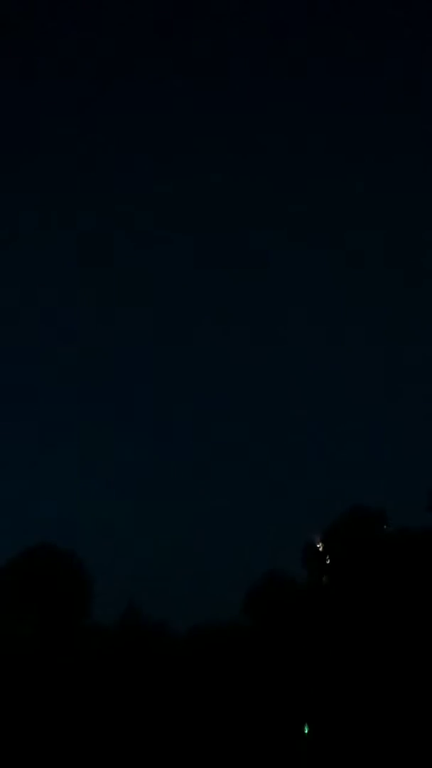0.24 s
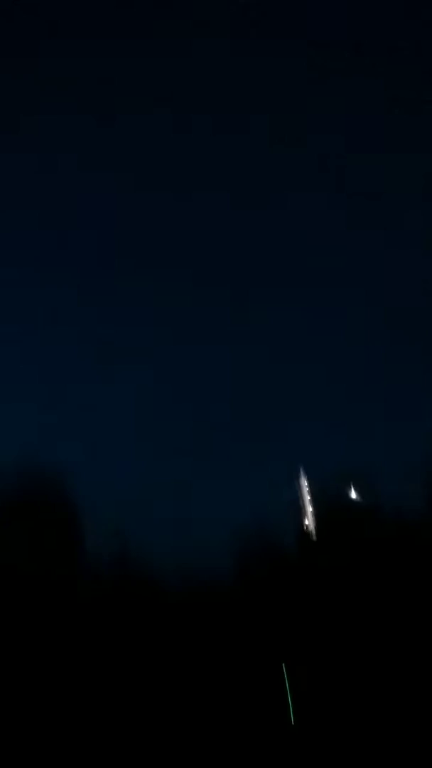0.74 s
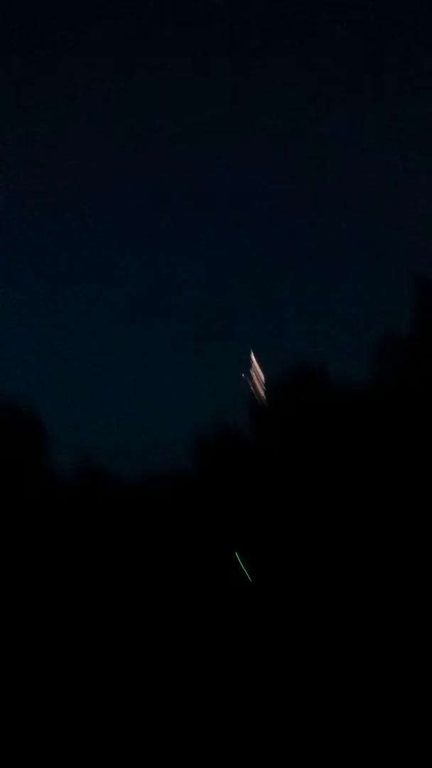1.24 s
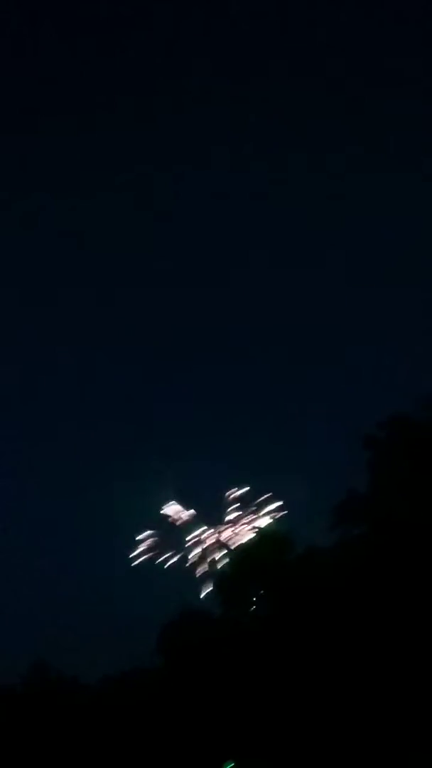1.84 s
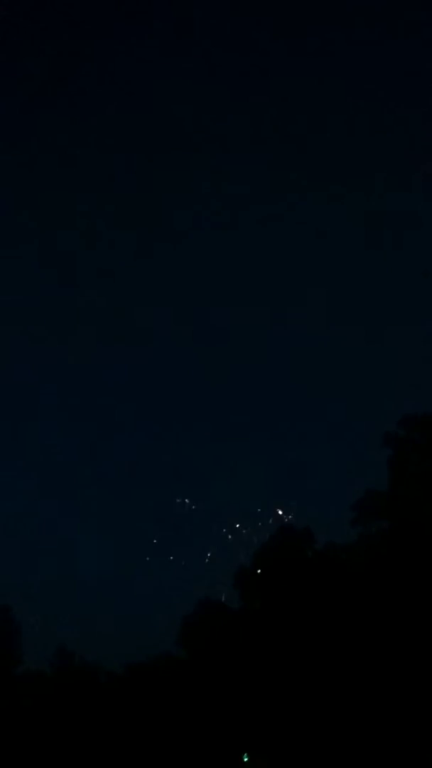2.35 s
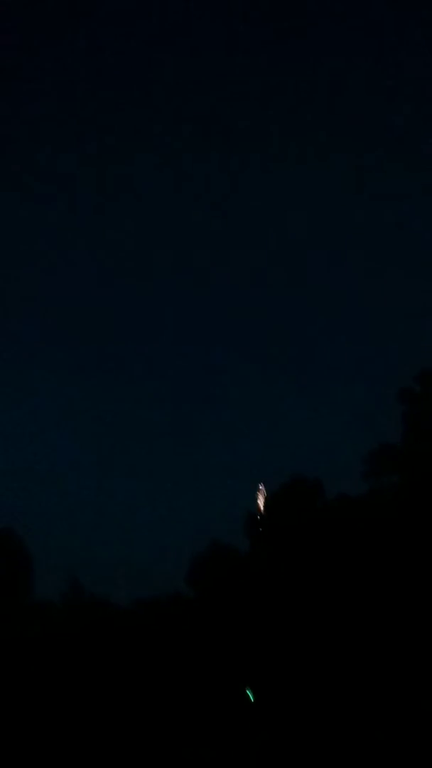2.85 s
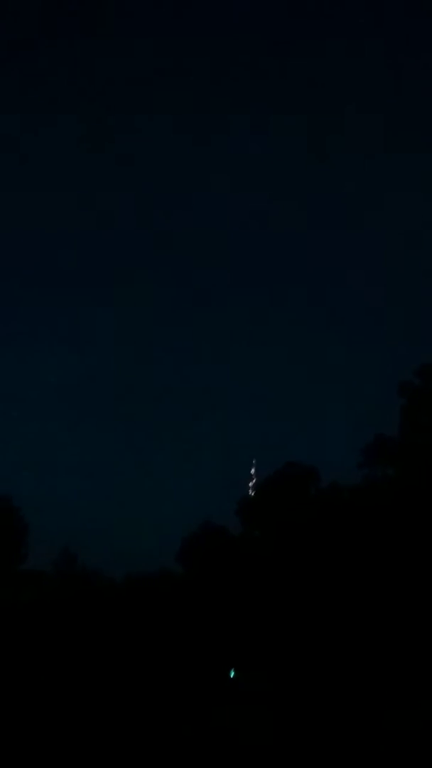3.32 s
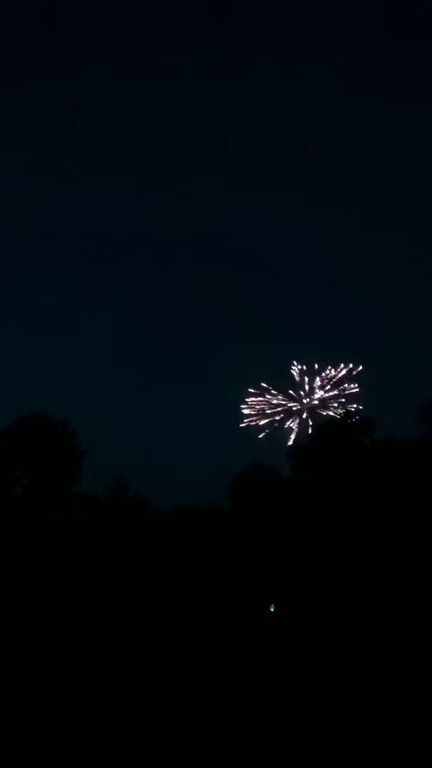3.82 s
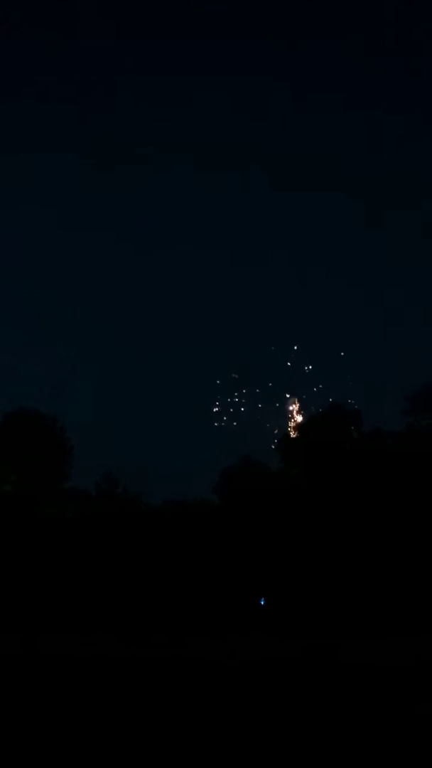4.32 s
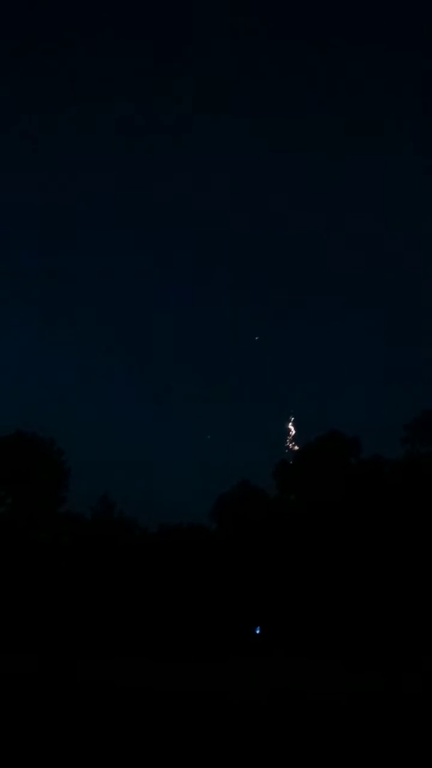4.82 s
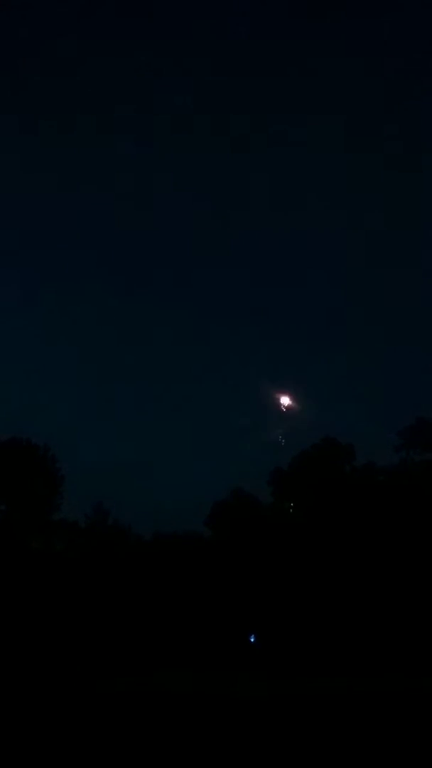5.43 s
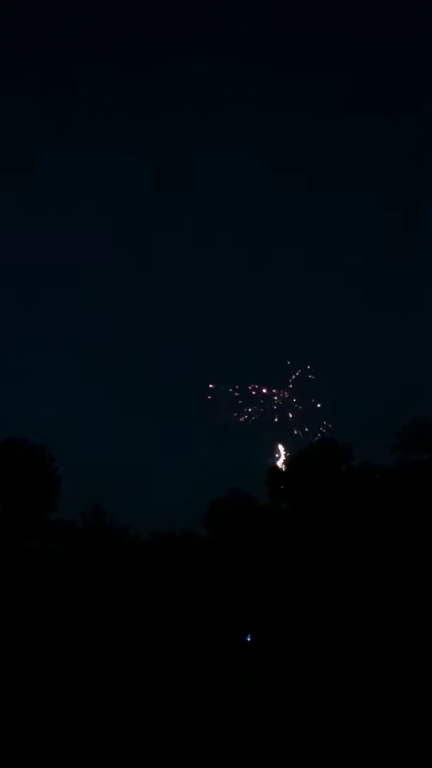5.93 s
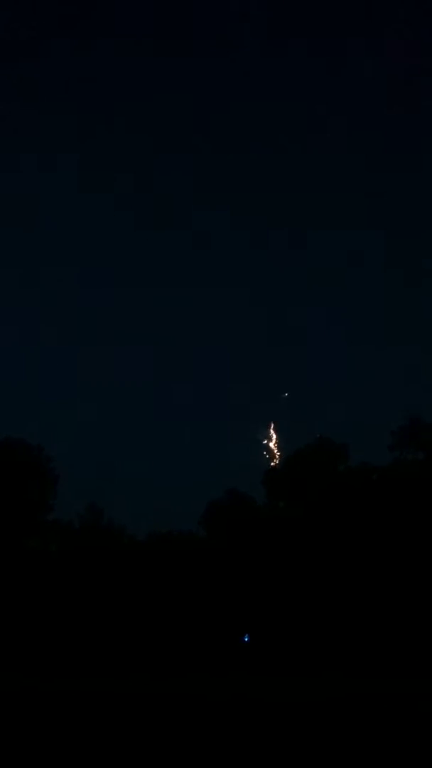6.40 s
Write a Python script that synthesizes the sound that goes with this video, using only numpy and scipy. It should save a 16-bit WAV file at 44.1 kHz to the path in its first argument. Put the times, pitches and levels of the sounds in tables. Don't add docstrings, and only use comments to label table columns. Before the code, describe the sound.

Three firework shells fire and burst beyond a tree-ringed garden. Each tube launch gives a short crack and low thump, followed by hissing and a heavy, distorted bang that bounces off houses and rolls off. Between them, stars crackle: loud and near at first, then finer and more distant. The microphone overloads on the bangs, and its handheld body colours them with a brief ring.

```python
import sys
import numpy as np
from scipy import signal
from scipy.fft import rfft, irfft, next_fast_len
from scipy.io import wavfile
from scipy.ndimage import uniform_filter1d

SR = 44100
rng = np.random.default_rng(int(sys.argv[2]) if len(sys.argv) > 2 else 0)


def natural_amplitude(level_db):
    exponent = np.asarray(level_db, float) / 20
    return 10 ** exponent


def unload_wav(signal):
    wavfile.write(
        sys.argv[1],
        SR,
        np.round(np.clip(np.atleast_2d(signal).T, -1, 1) * 32767).astype(np.int16),
    )


N = 293706

RUMBLE = [(24, -55), (40, -23.5), (145, -5.5), (394, -2), (696, -3), (1100, -13), (1430, -11.5),
          (2420, -120)]
FAR_ECHO = [(700, 5.5), (1000, -4), (1300, -3.5), (1800, -2.5), (2500, -10), (3800, -9.5), (4400, -11.5),
            (6000, -75)]
LEAVES = [(2000, 5), (3500, -2), (5000, -2.5), (7000, -21.5), (10000, -33), (12500, -63)]
YARD = [(350, -46), (550, -7), (850, 3.5), (1100, -12), (1400, -19)]
LANE = [(550, -19), (750, -4), (950, -1.5), (1150, -6), (1400, -27)]
CUPPED = [(2700, -22), (3300, 0), (3700, -13), (4100, -1), (4600, -17), (5400, -12)]
HEDGE = [(900, -20), (1500, 1), (2300, -2.5), (3900, -1), (4300, -27), (6000, -24)]
FUSE_HISS = [(1300, -4), (2400, 1), (2840, 9.5), (3380, -0.5), (4130, 8), (5600, -1), (6100, -17),
             (9000, -49)]
COMET_HISS = [(1400, -4.5), (1950, 4), (2500, -9), (3400, -16), (4050, 7.5), (4700, 0.5), (5500, -5.5),
              (6300, -30)]
AIR = [(6000, -33), (7500, -10), (11000, -7.5), (14500, -7), (15700, -1), (16100, -46)]
# f/Hz, left-right correlation
LIKENESS = [(60, 0), (180, 0.88), (550, 1), (1650, 0.31), (4970, -0.0), (15000, 0)]
# f/Hz, left minus right level/dB
LEAN = [(60, -22), (150, 3), (380, 5), (950, 4), (2380, 1.5), (5980, -3.5), (15000, 8)]

# t/s, near trees level/dB, their T60/s, valley level/dB, brightness/dB
TAILS = [
    (-.5, -28.5, 1.4, -37, 14),
    (1.852, -20, 0.12, -62, -4),
    (1.928, -25.5, 1.12, -38, 0),
    (3.542, -32, 0.72, -49, -2.5),
    (3.968, -28, 1.15, -35.5, 5),
    (5.297, -35.5, 0.88, -54, -2),
    (5.974, -32, 1.39, -44.5, 5),
]
# t/s, level/dB, T60/s
YARD_ROLLS = [
    (-.3, -39, 2.4),
    (1.94, -34, 1.37),
    (3.99, -34, 1.5),
    (5.99, -38, 1.7),
]
LANE_ROLLS = [
    (1.95, -40, 0.54),
    (4.05, -36, 0.63),
    (6.01, -35, 0.55),
    (6.1, -39, 0.62),
    (6.32, -40.5, 0.63),
]
CUPPED_ROLL = (1.935, -35.5, 0.76)
# t/s, level/dB
FUSE = [(0, -57), (.8, -55.5), (1.05, -49.5), (1.25, -45), (1.85, -43.5), (2.05, -46), (2.5, -56),
        (3.05, -52), (3.5, -43.5), (3.93, -43), (4.1, -50), (4.6, -50.5), (5.25, -51.5), (5.35, -45.5),
        (5.95, -43), (6.1, -52), (6.66, -54)]
# t/s, level/dB
COMET = [(0, -66), (1.0, -53), (1.3, -51), (1.6, -41.5), (1.88, -41.5), (2.0, -78), (3.2, -59),
         (3.6, -48.5), (3.93, -52), (4.05, -72), (5.25, -76), (5.4, -57.5), (5.94, -49), (6.05, -77),
         (6.66, -71)]

# t/s, crack level/dB, thump level/dB, thump f/Hz, late thump level/dB
LAUNCHES = [
    (1.849, -23.5, -12, 276, -18),
    (3.542, -24.5, -14.5, 270, -18),
    (5.2994, -28, -18, 265, -21),
]

# t/s, level/dB, brightness/dB
STARS = [(0.207, -27, 11), (0.229, -35, 5), (0.235, -29.5, 8), (0.2637, -25, 13), (0.2733, -22, 21),
         (0.2913, -17.5, 6), (0.3012, -30, -11), (0.3072, -16.5, 4), (0.313, -32, -4),
         (0.327, -21, -18), (0.334, -26, 13), (0.34, -16.5, -12), (0.344, -15.5, 6), (0.3514, -16.5, 4),
         (0.3603, -24, 12), (0.3961, -19, 0), (0.403, -24, 17), (0.4185, -22, 17), (0.4244, -20, 8),
         (0.4334, -16.5, 10), (0.443, -14.5, 20), (0.456, -14, -1), (0.475, -22, 11), (0.483, -21, 4),
         (0.4954, -20, 30), (0.511, -22, -8), (0.522, -27, 12), (0.5416, -29, -3), (0.564, -20.5, -20),
         (0.5754, -30, -6), (0.613, -20.5, 1), (0.63, -28, 17), (0.6539, -23, 16), (0.7211, -23.5, -11),
         (0.7378, -26, -11), (0.75, -16.5, -1), (0.778, -23, -11), (0.7925, -17.5, -20),
         (0.8253, -27, -6), (0.8454, -11.5, -4), (0.8583, -36, 5), (0.349, -22, 14), (0.379, -24, 6),
         (0.4155, -25, 12), (0.449, -25, 12), (0.463, -22, 8), (0.491, -24, 3), (0.316, -35, 8),
         (0.3305, -29, 8), (0.8775, -36, -5),
         (0.9156, -26, 11), (0.9228, -28, -4), (0.943, -27, -4), (0.952, -30, 6), (0.955, -26, 2),
              (0.9713, -13.5, -11), (0.9792, -38, 16), (0.987, -29, 7), (0.9963, -27, 12), (1.0024, -27, 9),
              (1.008, -29, 21), (1.0343, -26, 15), (1.045, -30, 9), (1.0488, -25.5, 19), (1.0536, -35, 11),
              (1.089, -17, 18), (1.104, -18.5, 4), (1.1114, -24, 14), (1.152, -30, 12), (1.1566, -24, 3),
              (1.183, -14, 16), (1.1875, -13.5, 12), (1.1978, -21, 30), (1.2039, -20, 26), (1.209, -16, 21),
              (1.2176, -14.5, 27), (1.2617, -10.5, 14), (1.267, -7, 14), (1.278, -11.5, 14),
              (1.2837, -12, 28), (1.2924, -8, 3), (1.3073, -14, 32), (1.3367, -8.5, 50), (1.349, -18, 29),
              (1.359, -25, 5), (1.364, -22, 19), (1.3713, -6, 53), (1.4141, -6, 53), (1.4975, -9.5, 33),
              (1.5168, -19, 25), (1.5732, -6, 34), (1.604, -16.5, 16), (1.7574, -13, 8), (1.332, -18, 25),
         (2.1518, -13.5, 3.8), (2.2105, -14.5, 11), (2.4641, -22, 8.2), (2.659, -36, 2),
             (2.7739, -50, 4), (2.8245, -32.5, 8.2), (2.845, -31, 4.5), (2.881, -33.5, 23),
             (2.914, -33.5, 28), (2.9308, -38, 18), (2.9534, -33, 30), (3.0082, -32.5, 26),
             (3.0132, -36, 26), (3.0327, -31, 24), (3.0366, -47, 13), (3.045, -33, 19), (3.0763, -29.5, 27),
             (3.1115, -43, 15), (3.1263, -33, 26), (3.1472, -26, 45), (3.149, -34, 39), (3.171, -30, 35),
             (3.185, -30.5, 27), (3.1954, -24, 25), (3.203, -25, 27), (3.2088, -23.5, 27),
             (3.2215, -29, 22), (3.236, -23.5, 21), (3.246, -29, 31), (3.2839, -28, 29), (3.3213, -19, 49),
             (3.4293, -15.5, 33), (3.4467, -21, 18), (3.4638, -18.5, 12), (3.534, -19, 9.8),
             (3.5449, -12, 45), (3.584, -20.5, 16),
         (4.3995, -23.5, 11), (4.4386, -26, 23), (4.4945, -30, 7), (4.511, -27.5, 11),
              (4.5768, -26.5, 9.1), (4.591, -27, 12), (4.6307, -25.5, 17), (4.6369, -23.5, 13),
              (4.6432, -30, 12), (4.688, -27, 13), (4.694, -28, 28), (4.7024, -25, 19), (4.7216, -24.5, 19),
              (4.751, -21, 38), (4.782, -26.5, 33), (4.8108, -26, 28), (4.8251, -24, 26), (4.8385, -33, 23),
              (4.849, -24, 17), (4.8533, -30, 18), (4.861, -37, 14), (4.8783, -24.5, 21), (4.888, -25, 27),
              (4.9077, -25.5, 34), (4.9425, -26, 15), (4.9577, -31, 26), (4.9904, -29, 31),
              (5.0382, -19.5, 29), (5.0427, -24, 45), (5.0612, -18.5, 45), (5.0688, -20, 37),
              (5.0977, -23, 24), (5.1926, -25, 32), (5.5495, -15, 30), (5.7162, -24, 18), (5.8659, -11, 10),
              (5.9426, -25, 3),
         (6.1017, -6, 70), (6.231, -25, 1), (6.3203, -15, 9), (6.333, -25, 27), (6.3616, -29, 5),
              (6.3686, -36, 11), (6.3908, -25, 5), (6.3936, -39, 3), (6.4233, -30, 16), (6.4447, -35, 13),
              (6.4498, -30, 26), (6.457, -28, 14), (6.503, -29, 24), (6.513, -26, 11), (6.5327, -27, 18),
              (6.5473, -17, 13), (6.5534, -15.5, 33), (6.56, -29, 20), (6.594, -31, 14),
              (6.5997, -19.5, 33), (6.6043, -18.5, 21), (6.6117, -22, 23), (6.617, -21, 26),
              (6.6225, -16.5, 16), (6.6335, -16.5, 16), (6.644, -16, 21), (6.6497, -10, 42),
              (6.6575, -20, 28),
         (4.312, -40, 18), (4.3396, -30, 13), (4.378, -26, 8.4), (4.455, -33, 20), (6.194, -37, 20),
          (6.277, -31, 20), (6.522, -30, 20), (6.528, -32, 20), (6.5785, -44, 25), (6.5825, -43, 22),
          (6.623, -35, 16)]
# t/s, scatter level/dB, sputter level/dB, snap level/dB
SPUTTER = [(0, -18, -51.5, -13), (.55, -15.5, -44.5, -1), (1.2, -16, -31, 15), (1.7, -16.5, -68, -19),
           (3, -16, -42, 9), (5, -15.5, -61, 11), (5.5, -16, -42, -17), (6.66, -19, -34, 1)]

# t/s, level/dB, ring f/Hz, ring width/Hz, ground echo level/dB
BURSTS = [
    (1.9180, 6, 713, 230, 3),
    (3.9645, 6.5, 650, 362, 1),
    (5.9710, 2, 870, 313, 1.5),
]
# crack level/dB, steep front level/dB, left ring width share,
# second shock level/dB, ground echo doubling
FRONTS = [
    (3, -33, 0.43, -6, 0.54),
    (10, -16, 0.94, -4, 0.35),
    (6.5, -21, 0.36, 2.5, 0.96),
]
# f/Hz, width/Hz, level/dB
BODY_MODES = [
    [(1530, 100, 5), (2370, 300, -2), (3420, 400, 0), (3800, 130, 6), (5500, 150, -15)],
    [(1620, 190, -3), (2300, 210, 4.5), (3030, 260, 2), (3600, 270, 1), (5500, 250, -19)],
    [(1850, 760, 0), (2940, 210, -3), (3590, 350, -4.5), (4370, 230, -15), (5360, 170, -30)],
]
# deep return level/dB, far wall delay/ms, hedge rattle level/dB
SITES = [
    (-17, 56, -45),
    (-15.5, 47, -28.5),
    (-31.5, 72, -36),
]
# delay/ms, level/dB, f/Hz
DEEP_RETURNS = [
    (18.8, 0, 127),
    (36.8, -29, 420),
    (64.9, 1.5, 162),
    (94.4, -8, 210),
    (141.2, -12, 160),
]
# t/s, level/dB, f/Hz
WALLS = [(1.936, -18, 200), (1.951, -26, 250), (1.957, -23, 750), (1.967, -19, 480), (1.971, -9, 720),
         (1.974, -10, 820), (1.979, -15, 520), (1.985, -12, 300), (1.994, -26, 650), (2.0, -19, 720),
         (2.016, -18, 620), (2.027, -17, 520), (2.148, -30, 800), (1.9323, -17, 580), (2.058, -22, 300),
         (4.086, -21, 700), (4.105, -22, 650), (4.117, -21, 620), (4.126, -21, 680), (4.137, -20, 600),
         (4.178, -24, 600), (3.982, -16, 260), (1.865, -27, 600), (1.876, -28, 450), (3.56, -28, 550),
         (5.317, -31, 550), (4.012, -12, 676), (4.015, -7, 674), (4.023, -11.5, 423), (4.028, -12, 620),
         (4.036, -17, 452), (4.048, -21, 400), (4.066, -20, 590), (5.989, -17, 360), (5.999, -19, 260),
         (6.02, -22, 950), (6.039, -12, 620), (6.042, -12, 950), (6.044, -16, 503), (6.05, -14, 550),
         (6.056, -23, 450), (6.071, -20, 620), (6.078, -24, 400), (6.112, -24, 900), (6.124, -35, 420),
         (6.148, -25, 820), (6.16, -30, 840), (6.176, -32, 950), (6.203, -26, 270)]

# delay/ms, gain
LEFT_PATHS = [(0, 1.01), (1.0, -.2), (1.95, .25), (2.5, -.15)]
RIGHT_PATHS = [(-.03, .65), (1.1, .3), (2.4, .2)]
# until t/s, delay/ms, gain
ROUND_HAND = [
    (.9, .42, .8),
    (1.9, .52, .9),
    (7.0, .3, .85),
]
# f/Hz, width/Hz, level/dB
LEFT_PORT = [(1256, 150, -15), (2000, 940, 0.5), (3150, 1050, -1), (8050, 3700, 0.5)]
RIGHT_PORT = [(800, 4500, -81), (2060, 590, -9.5), (3340, 1520, 5.5), (5390, 160, -21.5)]


def in_time(rows):
    s, *columns = np.transpose(rows)
    return [np.interp(np.arange(N) / SR, s, column) for column in columns]


def at_hz(points, hz):
    table_hz, values = np.transpose(points)
    return np.interp(np.log(hz), np.log(table_hz), values)


def drift(rate):
    knots = np.arange(0, N + SR, SR / rate / 2)
    return np.interp(np.arange(N), knots, rng.standard_normal(len(knots)))


def clicks(s, gain):
    out = np.full(N, 1e-18)
    at = np.round(np.atleast_1d(s) * SR).astype(int)
    inside = at < N
    np.add.at(out, at[inside], (gain * np.ones(len(at)))[inside])
    return out


def cut(x, hz, kind, order=2):
    return signal.sosfilt(signal.butter(order, hz, kind, fs=SR, output="sos"), x)


def ring(x, hz, width_hz):
    radius, angle = np.exp(-np.pi * width_hz / SR), 2 * np.pi * hz / SR
    return signal.lfilter([0, np.sin(angle)], [1, -2 * radius * np.cos(angle), radius ** 2], x)


def late(x, ms):
    return np.roll(x, round(ms * SR / 1000))


def decaying(x, db_per_s):
    return signal.lfilter([1], [1, -natural_amplitude(-db_per_s / SR)], x)


def dying(s, db, t60, rise_s=0.014):
    out, start = np.zeros(N), max(int(s * SR), 0)
    stop = min(N, start + int(t60 * SR))
    t = np.maximum(np.arange(start, stop) / SR - s, 0)
    swell = (1 - np.exp(-(t / rise_s) ** 2)) ** 2
    out[start:start + len(t)] = natural_amplitude(2 * db) * np.exp(-2 * np.log(1000) * t / t60) * swell
    return out


def noise(spectrum, patchy_db):
    size = next_fast_len(N)
    hz = np.maximum(np.arange(size // 2 + 1) * SR / size, 1)
    mid, side = rfft(rng.standard_normal((2, size))) * natural_amplitude(at_hz(spectrum, hz))
    alike = np.clip(at_hz(LIKENESS, hz), -1, 1)
    lean = natural_amplitude(at_hz(LEAN, hz) / 2)
    mid, side = mid * np.sqrt(1 + alike), side * np.sqrt(1 - alike)
    pair = np.array([(mid + side) * lean, (mid - side) / lean])
    together, out = drift(25), 0
    lowest, highest = np.log2(spectrum[0][0]), np.log2(spectrum[-1][0])
    for octave in np.arange(lowest + .5, highest + .5):
        band = np.cos(np.pi / 2 * np.clip(np.log2(hz) - octave, -1, 1)) ** 2
        flicker = natural_amplitude(patchy_db * (1.12 * together + drift(30)))
        out = out + irfft(pair * band, size)[:, :N] * flicker
    return out / np.sqrt(np.mean(out.mean(axis=0) ** 2))


def stars():
    s, db, bright_db = np.transpose(STARS)
    return s, db - 1.09, bright_db


def round_hand(shock):
    held = np.searchsorted([row[0] for row in ROUND_HAND], np.arange(N) / SR)
    return sum(gain * late(shock * (held == k), ms) for k, (_, ms, gain) in enumerate(ROUND_HAND))


def ports(shock, size_db, t60):
    out, spread = [], decaying(np.abs(late(shock, 0.68)), 60 / t60)
    for paths, port, bent in ((LEFT_PATHS, LEFT_PORT, 0), (RIGHT_PATHS, RIGHT_PORT, round_hand(shock))):
        direct = bent + sum(gain * late(shock, ms) for ms, gain in paths)
        scattered = natural_amplitude(size_db) * spread * rng.standard_normal(N)
        arrival = np.diff(direct + scattered, prepend=0)
        rung = sum(natural_amplitude(db) * ring(arrival, hz, width) * 3000 / hz for hz, width, db in port)
        out.append(cut(rung, 5200, "low", order=4))
    return -np.array(out)


def add(out, s, db, hz, left_ring):
    at = int(s * SR) + np.arange(-800, 800)
    turns = (at / SR - s) * hz
    pulse = natural_amplitude(db) * np.cos(2 * np.pi * turns) * np.exp(-((turns - .2) / 0.5) ** 2)
    out[:, at] += [pulse + left_ring * late(pulse, 2.14), 0.72 * pulse]
    return out


def thud(s, db, hz, left_ring):
    return add(np.zeros((2, N)), s, db, hz, left_ring)


def night_air():
    fuse_db, = in_time(FUSE)
    return natural_amplitude(-76 + 0.74 * (fuse_db + 50.5)) * noise(AIR, patchy_db=-3.0)


def reverberation():
    s, db, _ = stars()
    glow = decaying(clicks(s, natural_amplitude(2 * db)), 120 / 0.44)
    rumble = natural_amplitude(2 * -54.5)
    far = natural_amplitude(2 * -83) + natural_amplitude(2 * -31.5) * glow
    leaves = natural_amplitude(2 * -37.5) * glow
    for s, near_db, t60, valley_db, bright_db in TAILS:
        valley = dying(s, valley_db, t60=5.52)
        rumble = rumble + dying(s, near_db, t60) + valley
        far = far + dying(s + 0.0069, near_db + bright_db - 5.5, t60) + natural_amplitude(2 * -7.5) * valley
        leaves = leaves + dying(s, near_db + bright_db - 10.5, t60 * 0.8) + natural_amplitude(2 * -39.5) * valley
    out = np.sqrt(rumble) * noise(RUMBLE, patchy_db=1.2)
    out = out + np.sqrt(far) * noise(FAR_ECHO, patchy_db=1.3)
    return out + np.sqrt(leaves) * noise(LEAVES, patchy_db=.8)


def house_rolls():
    yard, lane = [sum(dying(*row) for row in rows) for rows in (YARD_ROLLS, LANE_ROLLS)]
    out = np.sqrt(yard) * noise(YARD, patchy_db=2.2)
    out = out + np.sqrt(lane) * noise(LANE, patchy_db=2.5)
    return out + np.sqrt(dying(*CUPPED_ROLL)) * noise(CUPPED, patchy_db=1.5)


def hedge_rattle():
    power = 0
    for (s, *_), (_, wall_ms, hedge_db) in zip(BURSTS, SITES):
        power = power + dying(s + (wall_ms - 11) / 1000, hedge_db, t60=0.79, rise_s=0.001)
    return np.sqrt(power) * noise(HEDGE, patchy_db=.8)


def wall_returns():
    out = np.zeros((2, N))
    for s, db, hz in WALLS:
        add(out, s, db, hz, left_ring=0.15)
    for (s, *_), (deep_db, *_) in zip(BURSTS, SITES):
        for ms, db, hz in DEEP_RETURNS:
            add(out, s + ms / 1000, deep_db + db, hz, left_ring=0.043)
    return out


def fuse_and_comet():
    fuse_db, = in_time(FUSE)
    comet_db, = in_time(COMET)
    comet = natural_amplitude(comet_db) * noise(COMET_HISS, patchy_db=3.0)
    return comet + natural_amplitude(fuse_db) * noise(FUSE_HISS, patchy_db=1.0)


def launches():
    s, crack_db = np.transpose(LAUNCHES)[:2]
    out = cut(ports(clicks(s, natural_amplitude(crack_db + 22.5)), -14.5, t60=0.04), 1440, "low")
    for s, crack_db, thump_db, hz, late_db in LAUNCHES:
        out = out - thud(s + .0001, crack_db + 9.0, 680, left_ring=0.08)
        ground, wall = (11.1, thump_db, 1.0, -16.0), (38.0, late_db, .85, -8.0)
        for ms, db, deeper, wake_db in (ground, wall):
            out = out + thud(s + ms / 1000, db, hz * deeper, left_ring=0.028)
            out = out - thud(s + (ms - 1.2) / 1000, db - 7.0, hz * 2.0, left_ring=0.11)
            out = out + thud(s + (ms + 9.9) / 1000, db + wake_db, hz * 0.6, left_ring=.03)
    return out


def crackle():
    s, db, bright_db = stars()
    scatter_db, sputter_db, snap_db = in_time(SPUTTER)
    per_s = 260
    tiny_db = sputter_db - 6.0 + 3.3 * np.minimum(rng.exponential(1, N), 3)
    tiny = (rng.random(N) < per_s / SR) * natural_amplitude(tiny_db)
    sharp = 1 / (1 + natural_amplitude(-1.2 * bright_db))
    bright = tiny + clicks(s, natural_amplitude(db) * np.sqrt(sharp))
    dull = clicks(s, natural_amplitude(db + 8.5) * np.sqrt(1 - sharp))
    far = cut(ports(natural_amplitude(5) * dull, scatter_db - 1.5, t60=.028), 1900, "low")
    near = ports(natural_amplitude(6.5) * bright, scatter_db, t60=0.015)
    snap = natural_amplitude(-15.5 + snap_db) * cut(bright, [4950, 8300], "band")
    return near + far + palm(bright) - snap


def palm(shock):
    sample = np.arange(N)
    up = (sample > ROUND_HAND[0][0] * SR) & (sample < ROUND_HAND[1][0] * SR)
    rung = ring(late(shock * up, .3) + 1e-18, hz=3960, width_hz=650)
    return natural_amplitude(-11) * rung * [[.2], [1]]


def body_ring(s, front_db, second_db, modes):
    body_db, second_s = -8.5, 0.0023
    both = clicks(np.array([s, s + second_s]), natural_amplitude(body_db + np.array([0, second_db])))
    rung = sum(natural_amplitude(db) * ring(both, hz, width_hz * 0.78) for hz, width_hz, db in modes)
    edge = natural_amplitude(front_db + 4.0 - body_db) * cut(both, 7500, "high") * [[1], [.7]]
    second = thud(s + second_s, second_db - 5.5, 720, left_ring=0)
    return -edge - np.array([rung, late(rung, .12)]) - second


def bursts():
    s, crack_db = np.transpose(BURSTS)[0], np.transpose(FRONTS)[0]
    out = ports(clicks(s, natural_amplitude(crack_db)), -20.5, t60=0.025)
    for burst, front, modes in zip(BURSTS, FRONTS, BODY_MODES):
        s, db, hz, width_hz, echo_db = burst
        _, front_db, left_share, second_db, doubling = front
        shock = clicks(s, natural_amplitude(db))
        left = ring(shock, hz * 0.924, width_hz * left_share)
        out = out - np.array([left, ring(shock, hz, width_hz)])
        out = out - signal.lfilter([1], [1, -.8], shock * natural_amplitude(front_db)) * [[1], [.6]]
        out = out + thud(s - .0002, -0.39, 1650, left_ring=0)
        out = out + thud(s + 0.0109, echo_db, 513, left_ring=doubling)
        out = out + body_ring(s, front_db, second_db, modes)
    return out


def scene():
    background = night_air() + reverberation() + house_rolls() + hedge_rattle() + wall_returns()
    return background + fuse_and_comet() + launches() + crackle() + bursts()


def roll_off(x):
    return signal.sosfilt(signal.butter(12, 16450, fs=SR, output="sos"), x)


def record(dry):
    over = np.abs(dry).max(axis=0) > 1.5
    recent = uniform_filter1d(over * 1., size=882, origin=440)
    first = np.flatnonzero(over & (recent < 1.5 / 882))
    ahead = round(0.010 * SR)
    duck_db = np.zeros(N)
    for i in first:
        duck_db[i - ahead:i - 30] = -12 * np.sin(np.linspace(0, 2.0, ahead - 30))
    x = dry * natural_amplitude(duck_db)
    x = cut(x / (1 + np.abs(x / 1.1) ** 4) ** .25, 70, "high")
    mid = x.mean(axis=0)
    side = cut((x[0] - x[1]) / 2, 260, "high")
    x = np.array([mid + side, mid - side])
    ceiling = .985
    x = x / (1 + np.abs(x / ceiling) ** 8) ** .125
    return roll_off(x)


dry = scene()
out = record(dry)
unload_wav(out)
```